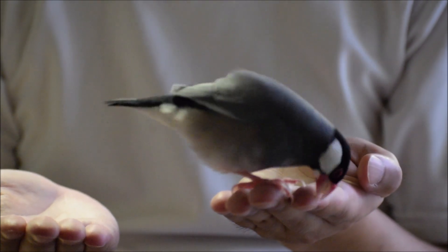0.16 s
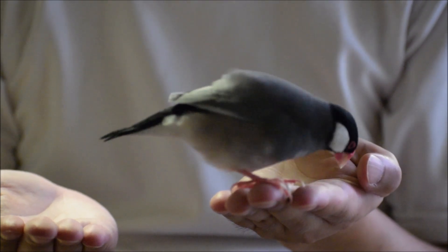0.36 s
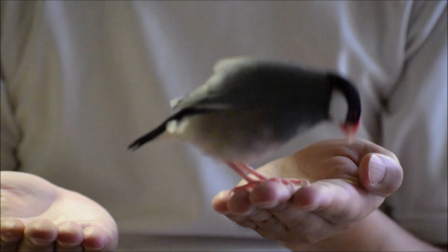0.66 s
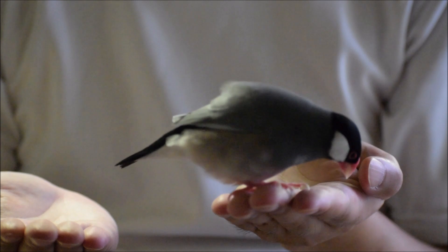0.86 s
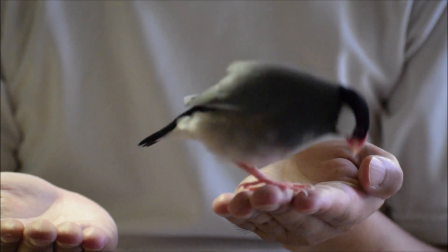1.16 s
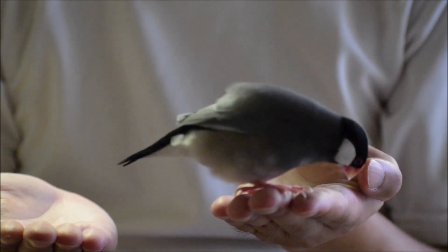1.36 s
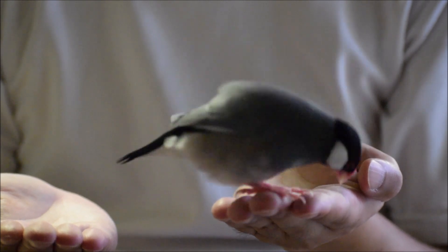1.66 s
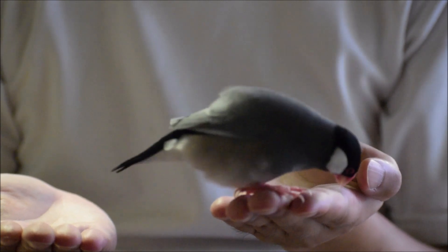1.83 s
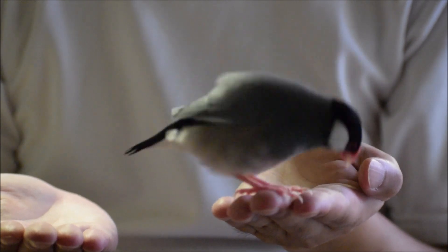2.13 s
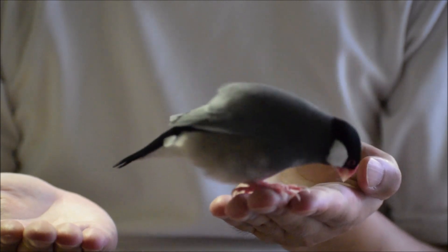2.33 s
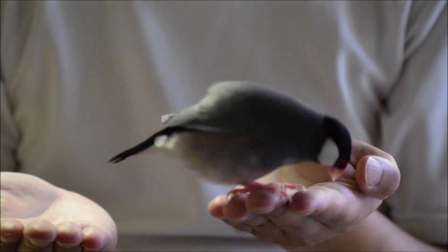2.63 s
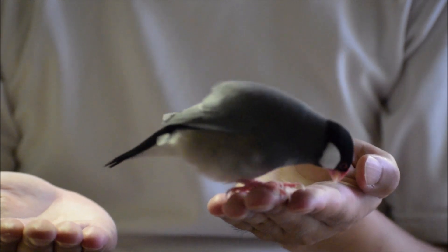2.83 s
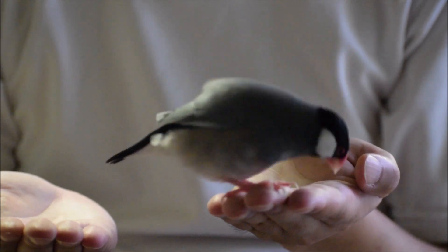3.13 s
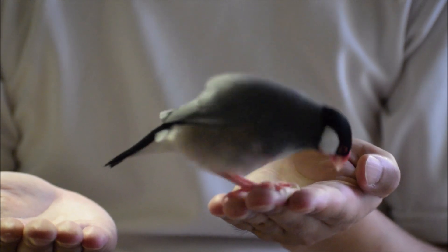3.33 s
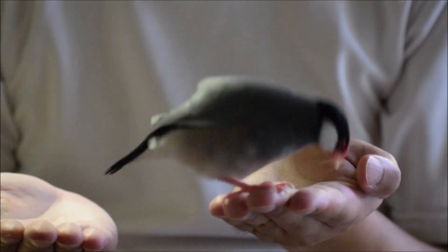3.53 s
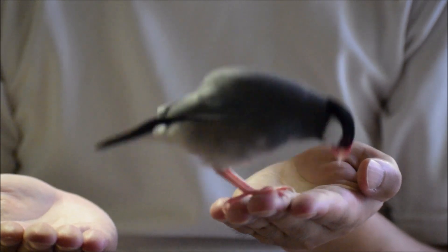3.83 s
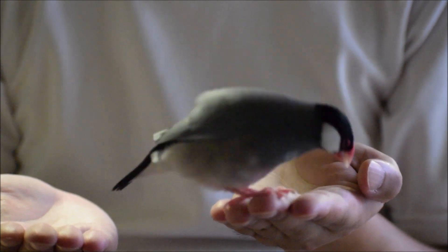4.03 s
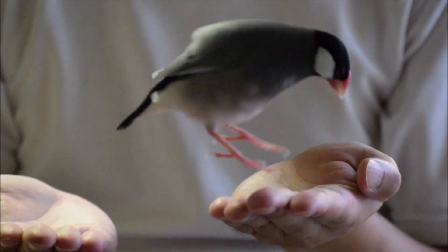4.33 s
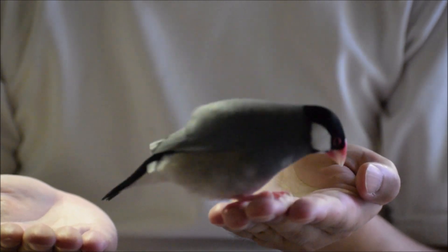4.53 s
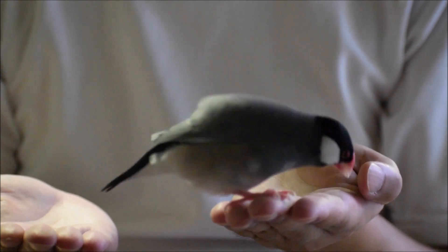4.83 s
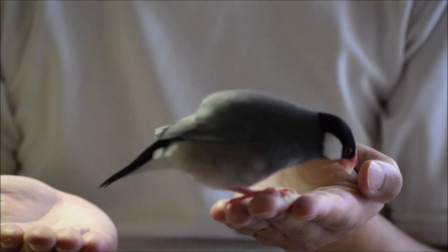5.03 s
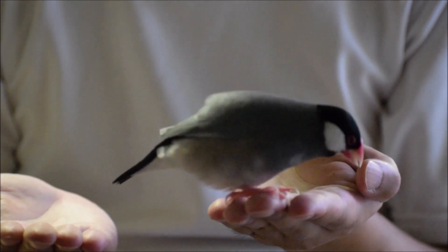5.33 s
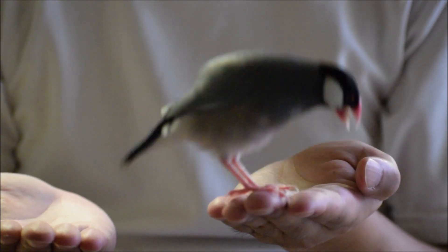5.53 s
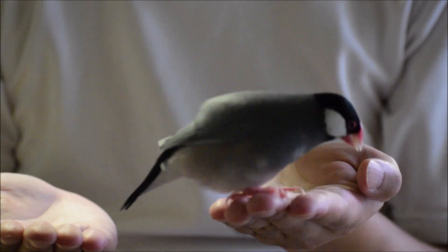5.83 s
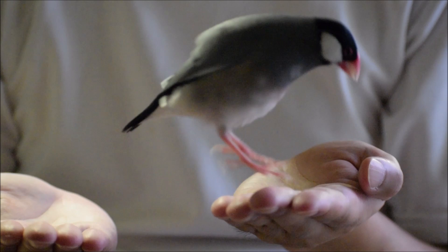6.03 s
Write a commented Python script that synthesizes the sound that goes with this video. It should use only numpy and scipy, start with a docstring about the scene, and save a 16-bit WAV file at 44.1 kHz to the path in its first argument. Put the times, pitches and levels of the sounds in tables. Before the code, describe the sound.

A small finch clicks its bill, then whistles a few high falling notes, close up in a quiet room.

```python
"""Finch on an open palm

A small finch snaps its bill in dry clicks, then whistles three falling notes and starts a fourth.
The first two flutter fast and are each followed by a soft, low slur; the third is a long, smooth glide.
A quiet, soft-furnished room throws back short echoes over faint hiss, hum and a tiny peep twice a second."""
import sys
import numpy as np
from scipy import signal
from scipy.fft import rfft, irfft, next_fast_len
from scipy.io import wavfile
from scipy.ndimage import uniform_filter1d

SR = 44100
rng = np.random.default_rng(int(sys.argv[2]) if len(sys.argv) > 2 else 0)


def unload_wav(signal):
    """Save mono or channel-first audio to the path in sys.argv[1] as 16-bit WAV at rate SR, clipped to [-1, 1]."""
    wavfile.write(
        sys.argv[1],
        SR,
        np.round(np.clip(np.atleast_2d(signal).T, -1, 1) * 32767).astype(np.int16),
    )


N = 272538


def gain_of(db):
    """Decibels to gain."""
    return 10 ** (np.asarray(db) / 20)


def curve_at(points, hz):
    """Reads a curve on a log frequency axis."""
    point_hz, value = np.transpose(points)
    return np.interp(np.log(hz + 1), np.log(point_hz + 1), value)


def fader(points):
    """Gain across the whole scene, from points of seconds and dB."""
    return gain_of(np.interp(np.arange(N) / SR, *np.transpose(points)))


def add(mix, start_s, sound):
    """Lays a sound into the mix, cut off where the mix ends."""
    part = mix[round(start_s * SR):][:len(sound)]
    part += sound[:len(part)]


# Tone of the noise floor. Each row: frequency in Hz, relative level in dB.
HISS_TONE = [(25, -7.5), (104, -7), (140, -10.5), (200, -8.5), (280, -9.5), (500, -7), (930, -3.5),
             (1200, -3), (1840, -6.5), (2520, -9), (4400, -14), (5300, -14.5), (5750, -13.5), (6300, -16.5),
             (15800, -22.5)]
# Stereo image of the hiss. Each row: frequency in Hz, left-right likeness from 0 (wide) to 1 (mono).
HISS_LIKENESS = [(60, 0.35), (150, 0.61), (380, 0.87), (950, 0.61), (2380, 0.12), (5980, 0.079),
                 (15000, 0.36)]
# A late swell in the low mids of the air. Each row: time in seconds, boost in dB.
AIR_SWELL = [(0, .1), (2.75, -1), (3.35, 0.2), (5.2, .5), (5.58, 4.5), (6.0, 2)]


def hiss(level_db=-59):
    """Room air and microphone noise, partly shared by both sides."""
    frames, hz = N // 512 + 5, np.fft.rfftfreq(2048, 1 / SR)
    a, b, c, d = rng.standard_normal((frames, 1025, 4)).T
    likeness = curve_at(HISS_LIKENESS, hz)[:, None]
    left = a + 1j * b
    right = likeness * left + np.sqrt(1 - likeness ** 2) * (c + 1j * d)
    spectra = np.array([left, right]) * gain_of(curve_at(HISS_TONE, hz))[:, None]
    noise = signal.istft(spectra, nperseg=2048, noverlap=1536)[1][:, :N]
    noise *= gain_of(level_db) / noise.mean(0).std()
    low_mids = signal.sosfilt(signal.butter(2, [450, 1250], "bandpass", fs=SR, output="sos"), noise)
    return noise + low_mids * (fader(AIR_SWELL) - 1)


# Steady tones of the hum. Each row: frequency in Hz, RMS level in dB.
HUM_TONES = [(100.2, -84.5), (200, -85), (540.5, -80.5), (2160.7, -78), (5906, -84)]
# Fader ride of the low drone. Each row: time in seconds, RMS level in dB.
DRONE_RIDE = [(0, -63.5), (.2, -69), (.4, -63), (.65, -68), (1.0, -82), (1.25, -68), (1.5, -77),
              (6.18, -86)]


def hum(drone_hz=49.7):
    """Faint steady tones over a low drone that wavers and fades."""
    t = np.arange(N) / SR
    tones = sum(gain_of(db) * np.sin(2 * np.pi * (hz * t + rng.random())) for hz, db in HUM_TONES)
    drone = fader(DRONE_RIDE) * np.sin(2 * np.pi * (drone_hz * t + rng.random()))
    return np.sqrt(2) * (tones + drone)


# The peeps in turn. Each entry: relative level in dB.
PEEP_LEVELS = [-75, -70, -76, -70.5, -74, -71, -78, -81, -70.5, -76, -74, -81]


def peeps(first_s=.22, every_s=.502, length_s=.078, slide_hz=(5860, 5700)):
    """A tiny, regular peep in two soft halves, the second a little lower."""
    progress = np.arange(round(length_s * SR)) / (length_s * SR)
    phase = 2 * np.pi * np.cumsum(np.interp(progress, [0, 1], slide_hz)) / SR
    peep = 2 * np.sin(2 * np.pi * progress) ** 2 * np.sin(phase)
    out = np.zeros(N)
    for n, db in enumerate(PEEP_LEVELS):
        add(out, first_s + n * every_s, gain_of(db) * peep)
    return out


# Echoes off palm and chest, then the walls. Each row: delay in milliseconds, left gain, right gain.
EARLY_ECHOES = [(.52, .24, .17), (.75, -.32, -.36), (1.63, .26, .35), (1.95, -.3, -.29), (2.93, -.24, -.21),
                (5.46, .18, .07), (7.78, .15, .13), (8.41, .15, .15), (11., .19, .15), (11.5, .19, .21),
                (12.45, .15, .13), (20.01, .17, .15)]
# Decay of the room. Each row: frequency in Hz, seconds to fall by 60 dB.
ROOM_DECAY = [(1000, 0.14), (2600, 0.17), (5000, .21), (9000, 0.23), (14000, 0.045)]


def room(sound, direct_db, pan_db, tail_db=-2, mid_gain=.96):
    """Direct sound, close echoes and a short, narrow tail that the soft furnishings soak up."""
    size = SR // 2
    taps = np.zeros((2, size))
    tap_at = np.arange(120, size - 12, 12) + rng.integers(0, 12, (2, (size - 121) // 12))
    np.put_along_axis(taps, tap_at, rng.choice([-1., 1.], tap_at.shape), 1)
    mid, side = mid_gain * taps[0], np.sqrt(1 - mid_gain ** 2) * taps[1]
    hz, t, spectra = signal.stft(np.array([mid + side, mid - side]), SR, nperseg=128)
    decay = gain_of(-60 * t / curve_at(ROOM_DECAY, hz)[:, None])
    response = signal.istft(spectra * decay, SR, nperseg=128)[1][:, :size]
    response *= gain_of(tail_db) / np.linalg.norm(response[0])
    response[:, 0] = gain_of(direct_db)
    for ms, *gains in EARLY_ECHOES:
        response[:, round(ms * SR / 1000)] += gains
    pan = gain_of([[pan_db / 2], [-pan_db / 2]])
    return pan * signal.fftconvolve(sound[None], response, axes=1)[:, :N]


# Ring of the bill. Each row: base frequency in Hz, relative level in dB, seconds to fall by 60 dB.
BILL_MODES = [(3130, 14.5, 0.0011), (2190, 3.5, 0.0028), (3950, 0.5, 0.0024), (8980, -5, 0.0018),
              (13100, -25, .001)]
# Snaps of the bill. Each row: start in seconds, dry peak level in dB, brightness in dB per octave,
# milliseconds until the rebound (1 or less means none).
BILL_SNAPS = [(.5250, -43, 1, 1.6), (.5294, -37.5, -2, 1.6), (.5340, -41, 0, 5.8), (1.0438, -27.5, 0, 0),
              (1.4344, -26.5, .1, 0), (1.9068, -26.5, -.5, 0), (2.3419, -26, -3, 14.0),
              (2.5051, -27, 3.5, 8.6), (2.7999, -26, -1, 11.2), (2.9581, -28.5, -5, 6.7),
              (3.2141, -25.5, -2, 0), (3.358, -45.5, -4, -0.5), (3.7789, -25.5, -1, 9),
              (4.5220, -26, -15, 9.5), (5.024, -27.5, -9, 8.5), (5.5071, -28.5, 1, 7)]


def bill_clicks(low_cut_hz=1460, rebound_db=-1.6, rebound_tilt_db=2):
    """The halves of the bill snap together and ring briefly; so small a thing sends out no bass."""
    t, tracks = np.arange(300) / SR, np.zeros((2, N))
    detunes = rng.uniform(1.0, 1.123, (len(BILL_SNAPS), 2, len(BILL_MODES)))
    low_cut = signal.butter(4, low_cut_hz, "highpass", fs=SR, output="sos")
    for n, (start_s, snap_db, snap_tilt_db, rebound_ms) in enumerate(BILL_SNAPS):
        hits = [(start_s, snap_db, snap_tilt_db)]
        if rebound_ms > 1:
            hits.append((start_s + rebound_ms / 1000, snap_db + rebound_db, rebound_tilt_db))
        for m, (hit_s, peak_db, tilt_db) in enumerate(hits):
            ring = np.zeros(len(t))
            for (hz, db, t60), detune in zip(BILL_MODES, detunes[n, m]):
                mode_db = db + tilt_db * np.log2(hz / BILL_MODES[0][0])
                ring += gain_of(mode_db - 60 * t / t60) * np.sin(2 * np.pi * hz * detune * t)
            ring = signal.sosfilt(low_cut, ring)
            # clicks alternate between two tracks; each gets its own random room tail, varying the ring
            add(tracks[(n + m) % 2], hit_s - 8 / SR, gain_of(peak_db) * ring / abs(ring).max())
    return tracks


# Contour of each kind of note, before it is tuned and stretched.
# Each row: time into the note in seconds, pitch in Hz, relative level in dB.
NOTE_CONTOURS = { "chirp": [(0, 2750, -8), (.002, 3300, -12), (.0045, 4250, 1), (.009, 5504, 1.5),
                 (.0135, 6750, -5), (.022, 6750, -17), (.031, 6400, -9.5), (.042, 5350, -1),
                 (.053, 4240, -4), (.066, 4000, -7), (.082, 3040, -11.5), (.097, 2425, -14),
                 (.113, 2237, -20), (.138, 2295, -27), (.182, 2220, -26.5)], "drop": [(0, 2065, -5),
                 (.011, 1797, -5), (.026, 1444, 0), (.038, 1257, 1), (.051, 1140, -3), (.061, 1060, -10)],
                 "glide": [(0, 2347, -12), (.0075, 3156, -15), (.0095, 4120, -12.5), (.0165, 5130, 1),
                 (.0225, 6320, -13.5), (.0335, 5950, -9.5), (.0465, 5310, -3.5), (.0615, 4590, 1),
                 (.0815, 4300, -2), (.1015, 3930, -5.5), (.1695, 3468, -6.5), (.2295, 3246, -4),
                 (.2795, 3022, -9.5), (.33, 2800, -10), (.357, 2600, -10), (.43, 2450, -8),
                 (.452, 2370, -8.5), (.475, 2150, -13), (.488, 2140, -27), (.55, 2130, -36)]}
# Timbre of each kind. Each row: octave overtone at the attack in dB, its hold in seconds, its later
# level in dB, deepest flutter from 0 to 1, seconds to reach that, flutter depth at the end.
NOTE_TIMBRES = {"chirp": (-18, .003, -33, .85, .045, .45), "drop": (-30, .004, -31, .92, .002, .45),
                "glide": (-5, .008, -33, 0.1, .08, .02)}


def whistle(kind, note_db, tuning, stretch, flutter_hz=175.6, flutter_bend=.082):
    """A near-pure tone with a weak octave, strongest at the attack; a fast flutter chops the fall."""
    contour_s, contour_hz, contour_db = np.transpose(NOTE_CONTOURS[kind])
    attack_db, hold_s, later_db, deepest, grow_s, end_depth = NOTE_TIMBRES[kind]
    t = np.arange(0, stretch * contour_s[-1], 1 / SR)
    hz, level_db = (uniform_filter1d(np.interp(t, stretch * contour_s, curve), size=60, mode="nearest")
                    for curve in (tuning * contour_hz, note_db + contour_db))
    octave_db = np.interp(t, [hold_s, hold_s + .0037], [attack_db, later_db])
    octave_db -= 18 * np.maximum(np.log2(hz / 4700), 0)  # the overtone thins out on the highest pitches
    depth = np.minimum(t / grow_s, 1) ** 2 * np.interp(t, [grow_s, t[-1]], [deepest, end_depth])
    flutter = depth * np.exp(2j * np.pi * (flutter_hz * t + rng.random()))
    # each beat of the flutter bends the pitch as well as the loudness
    vibrato, tremolo = 1 + flutter_bend * flutter.imag, 1 + flutter.real
    phase = 2 * np.pi * np.cumsum(hz * vibrato) / SR
    tone = np.sin(phase) + gain_of(octave_db) * np.sin(2 * phase)
    edge_fades = np.minimum(1, np.minimum(t, t[-1] - t) / .00064)
    return np.sqrt(2) * gain_of(level_db) * tremolo * edge_fades * tone


# The phrase. Each row: start in seconds, kind of note, level trim in dB, pitch factor, length factor.
SONG_NOTES = [(4.6415, "chirp", -34, 1.012, .98), (4.824, "drop", -45, 0.99, 1.01),
              (5.1216, "chirp", -32, .98, 1.02), (5.312, "drop", -45.5, 0.99, 0.96),
              (5.5504, "glide", -30, 1.001, 1.001), (6.1524, "glide", -31.5, 1.01, .95)]


def song():
    """The finch whistles its phrase; the scene ends just as the last note begins."""
    out = np.zeros(N)
    for start_s, *note in SONG_NOTES:
        add(out, start_s, whistle(*note))
    return out


def scene():
    """The bird in the room over the noise floor; it sings with its head turned, so less arrives direct."""
    dry_song = song()
    bill = sum(room(track, direct_db=.43, pan_db=.5) for track in bill_clicks())
    voice = room(dry_song, direct_db=-1.0, pan_db=.8)
    return bill + voice + hiss() + hum() + peeps()


# Tone of the microphone. Each row: frequency in Hz, gain in dB.
MICROPHONE_EQ = [(6000, -0.47), (7300, -2.5), (9400, 1.5), (10700, -2.5), (13000, -4), (15800, -11)]


def record(dry, high_cut_hz=15750, dc_offset=-.0029):
    """Microphone colour with a treble bump, a steep high cut and a small constant offset."""
    size = next_fast_len(N + 512)
    eq = gain_of(curve_at(MICROPHONE_EQ, np.fft.rfftfreq(size, 1 / SR)))
    coloured = irfft(rfft(dry, size) * eq, size)[:, :N]
    high_cut = signal.firwin(511, high_cut_hz, window=("kaiser", 9), fs=SR)
    return signal.oaconvolve(coloured, high_cut[None], "same") + dc_offset


dry = scene()
out = record(dry)
unload_wav(out)
```